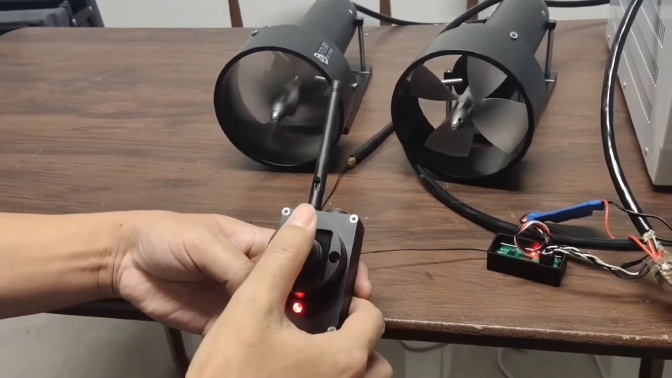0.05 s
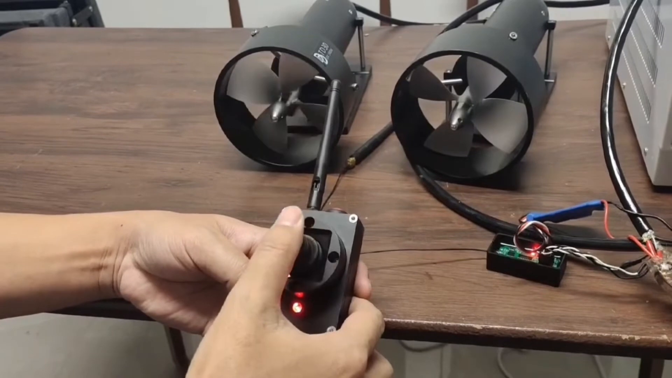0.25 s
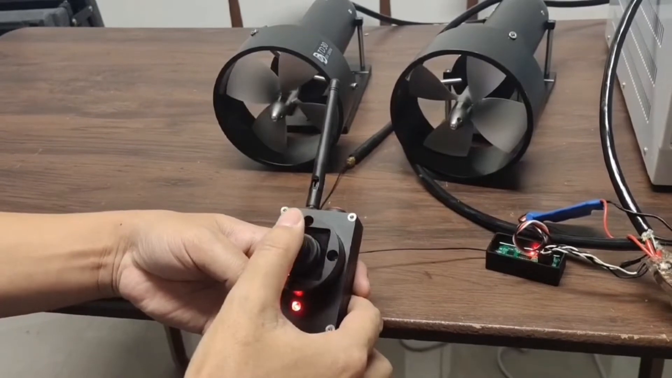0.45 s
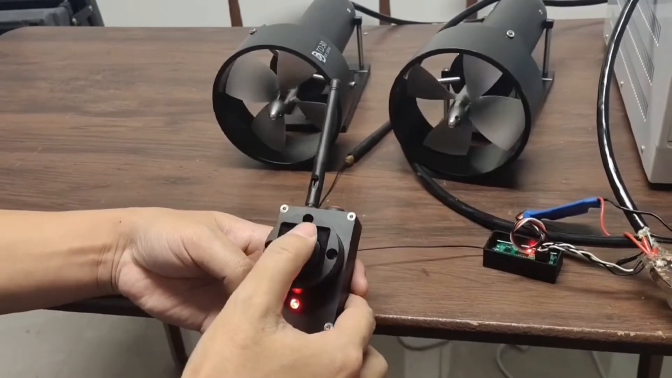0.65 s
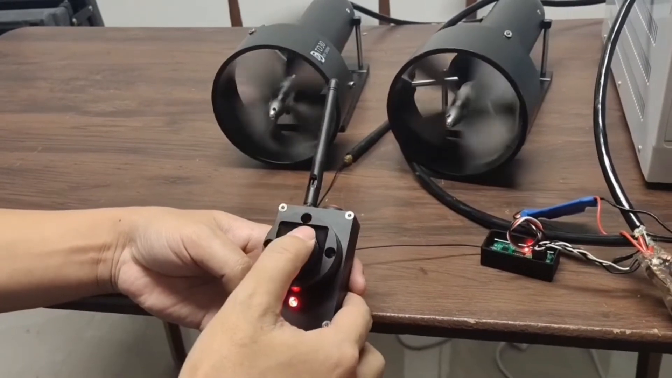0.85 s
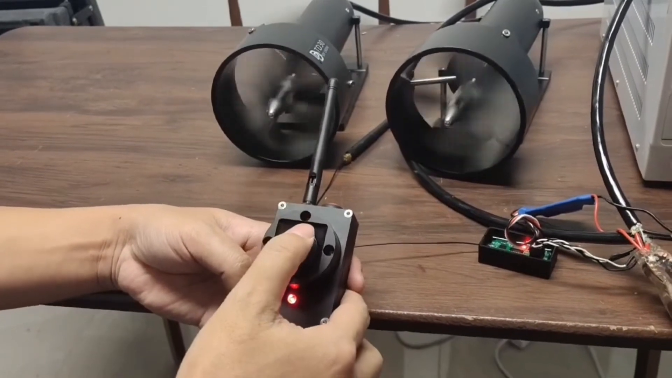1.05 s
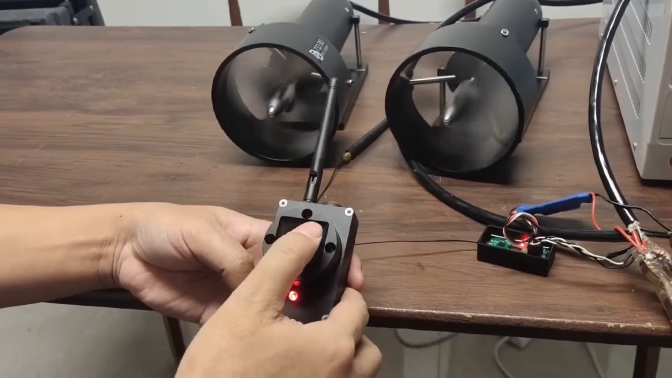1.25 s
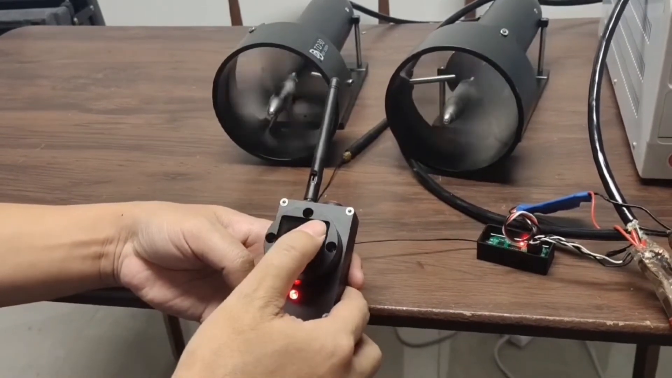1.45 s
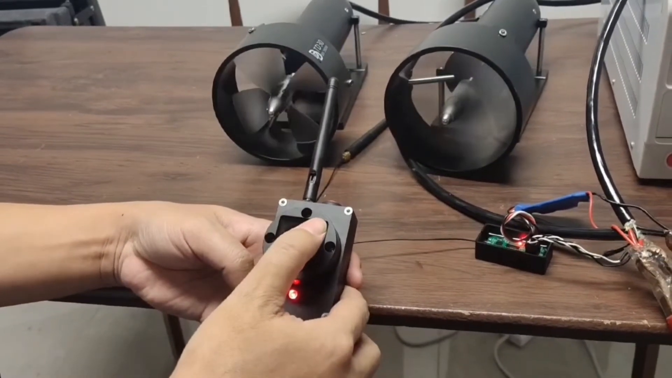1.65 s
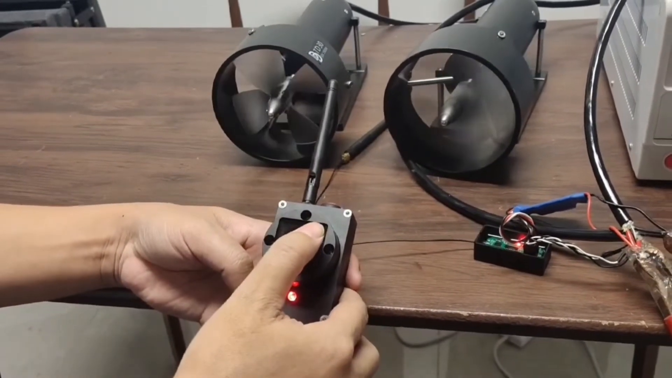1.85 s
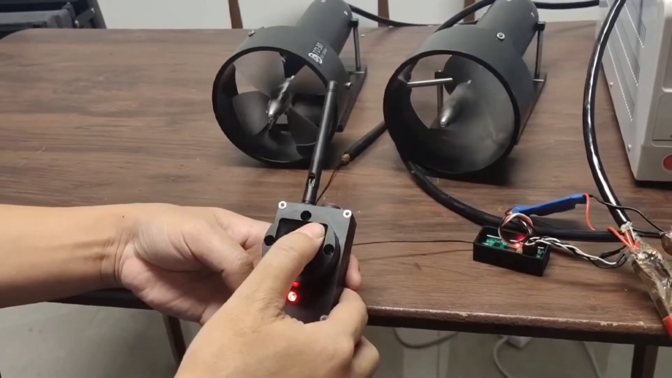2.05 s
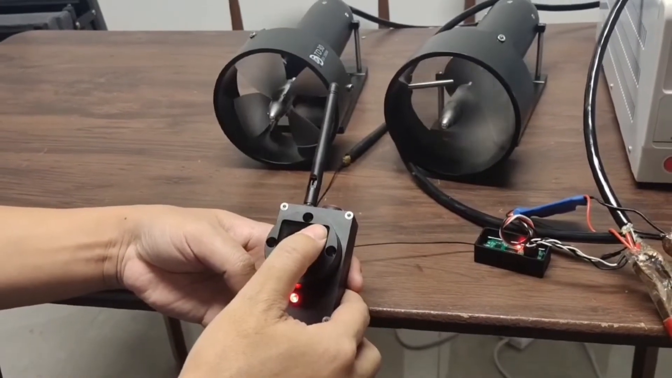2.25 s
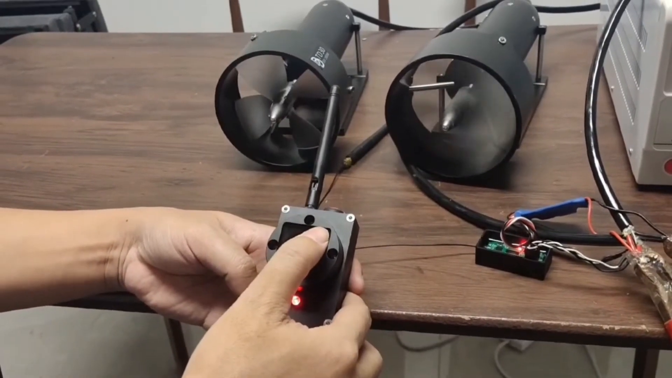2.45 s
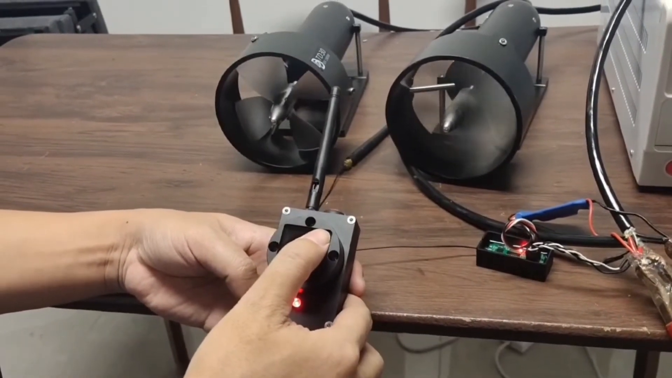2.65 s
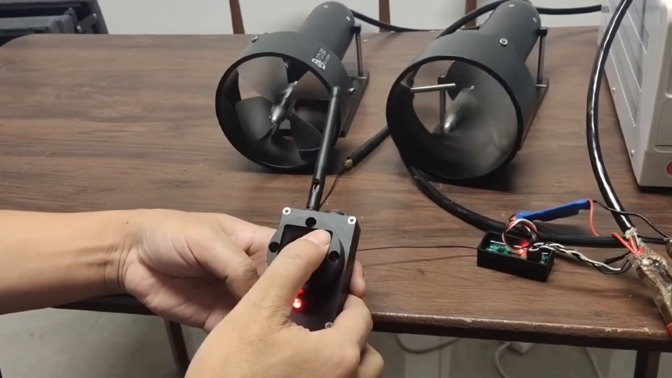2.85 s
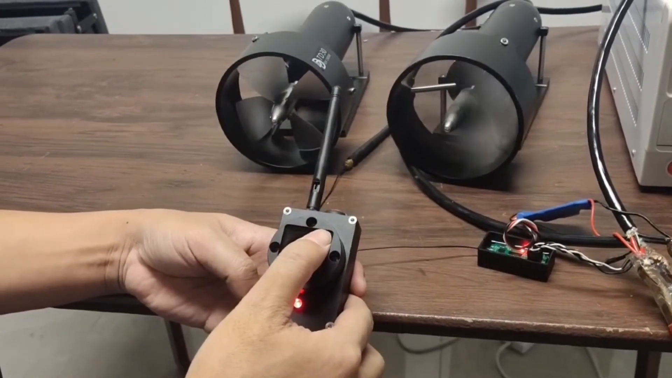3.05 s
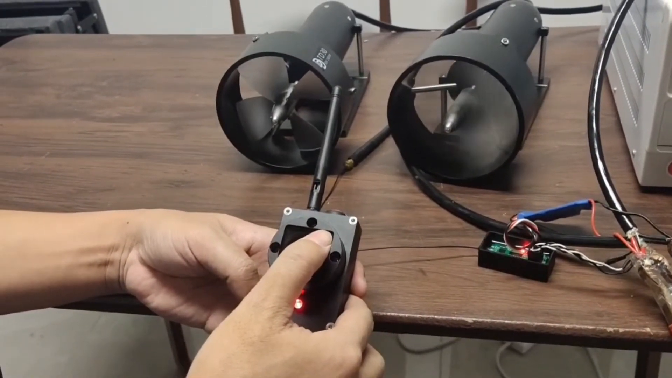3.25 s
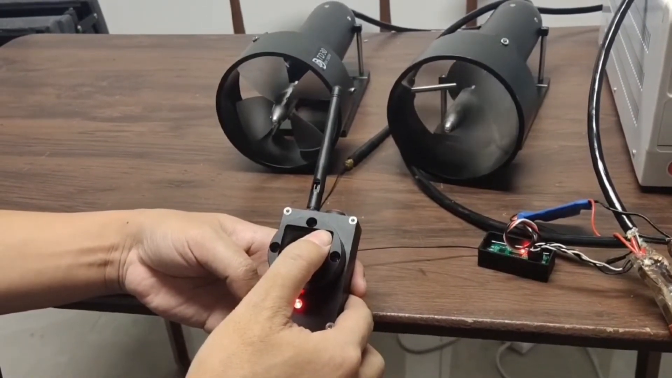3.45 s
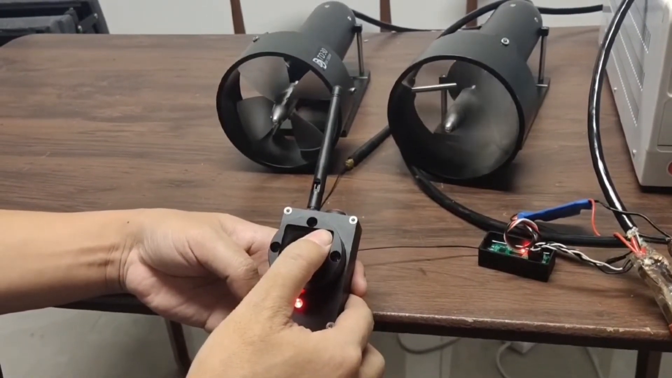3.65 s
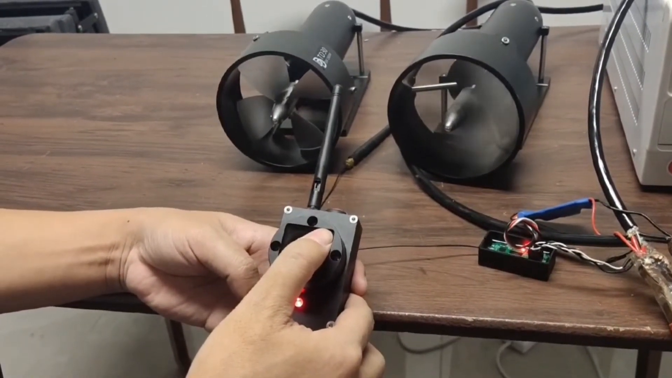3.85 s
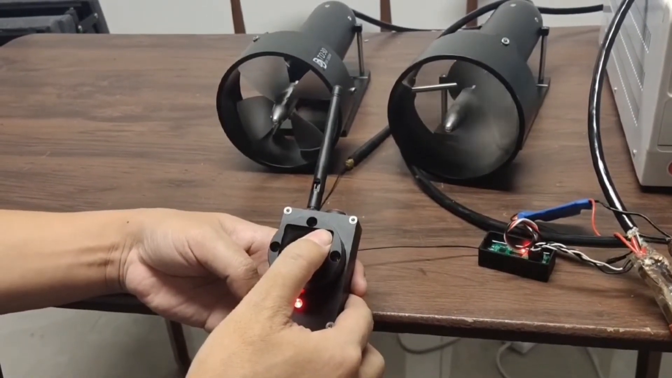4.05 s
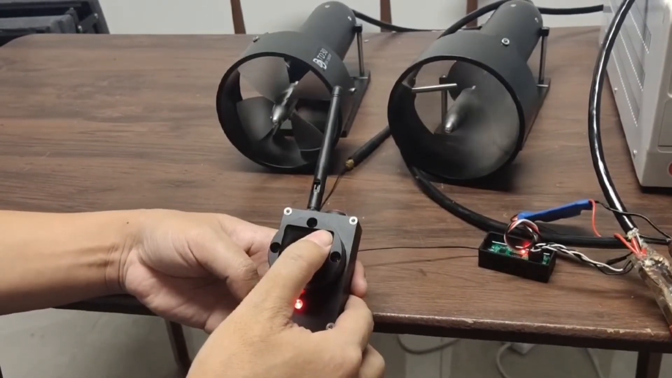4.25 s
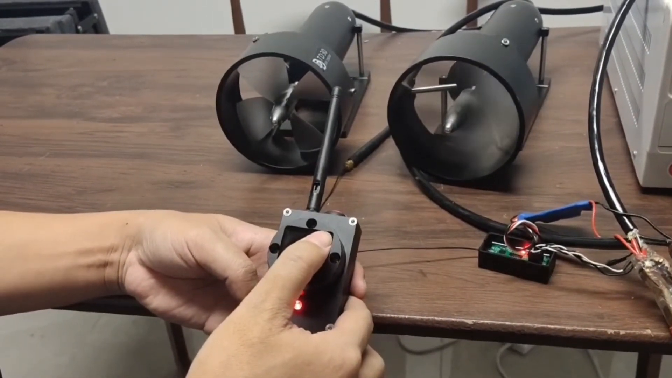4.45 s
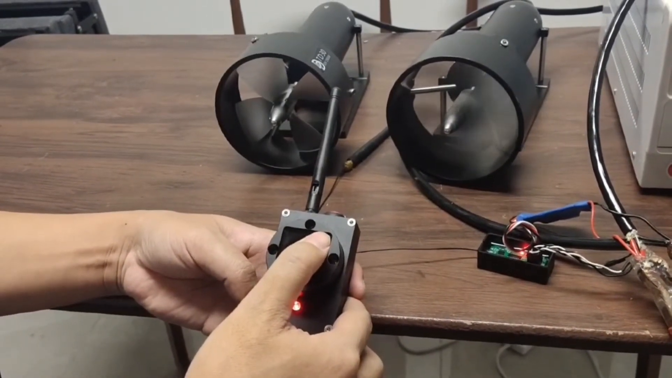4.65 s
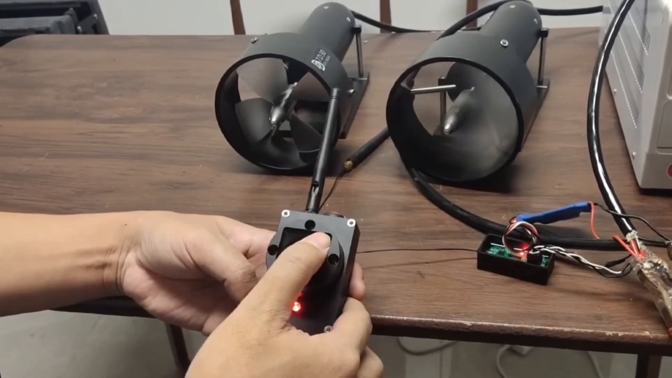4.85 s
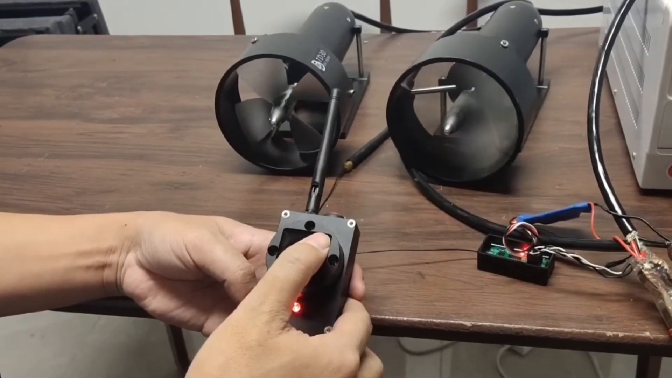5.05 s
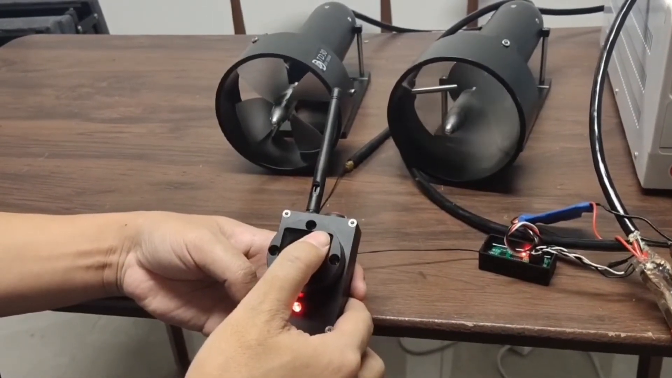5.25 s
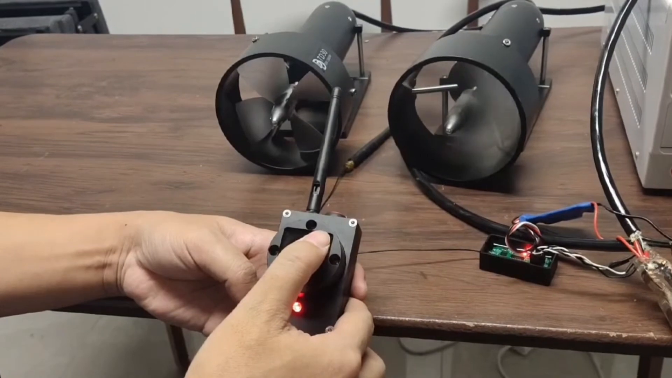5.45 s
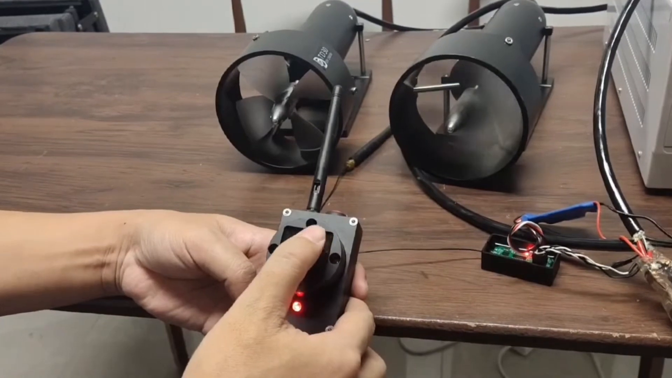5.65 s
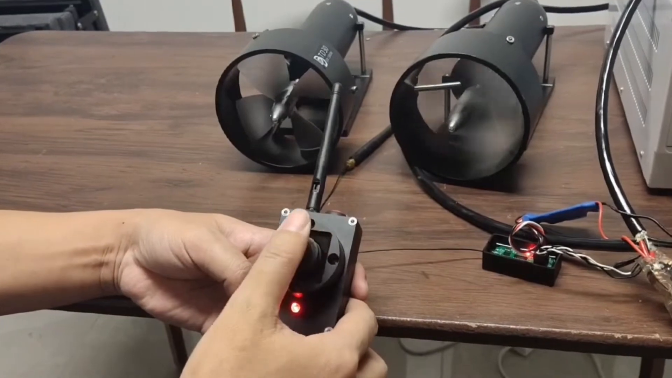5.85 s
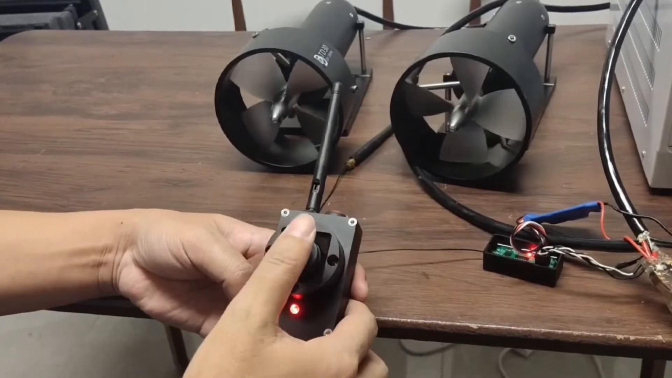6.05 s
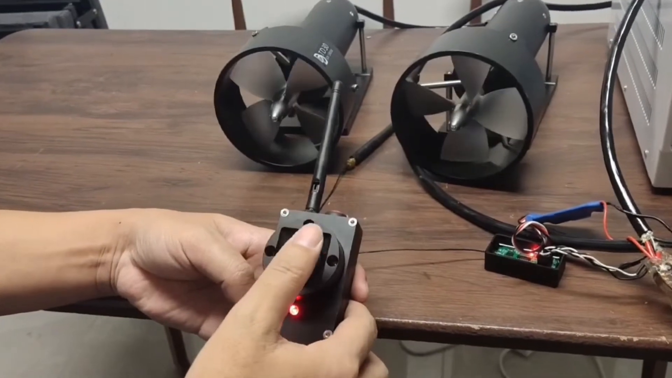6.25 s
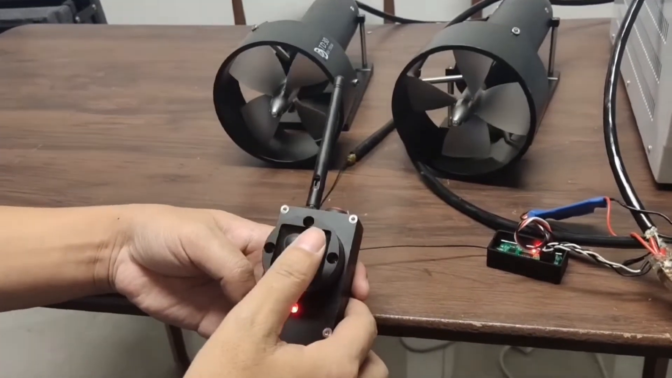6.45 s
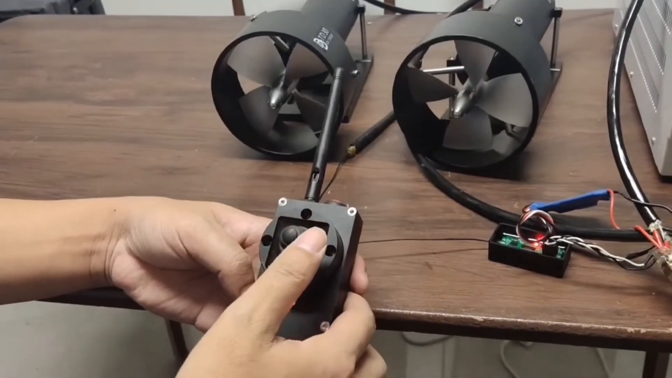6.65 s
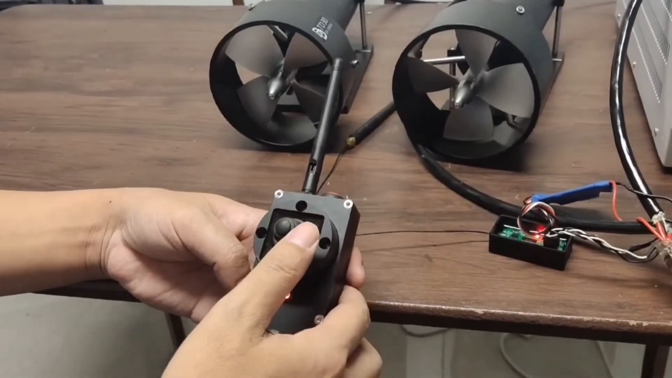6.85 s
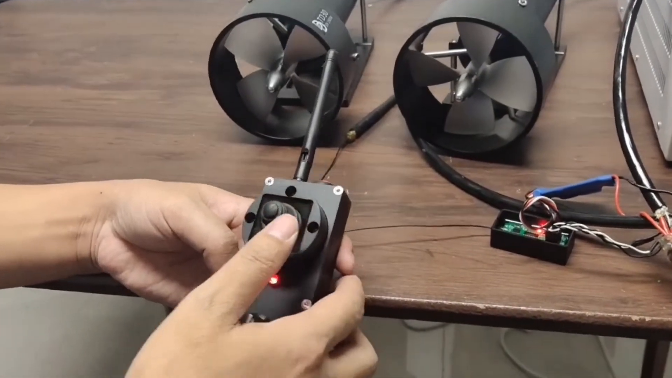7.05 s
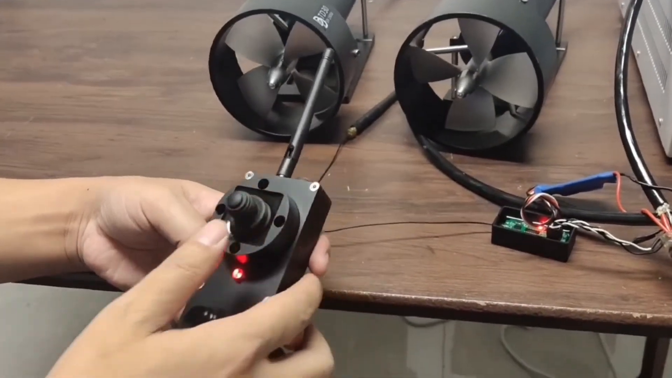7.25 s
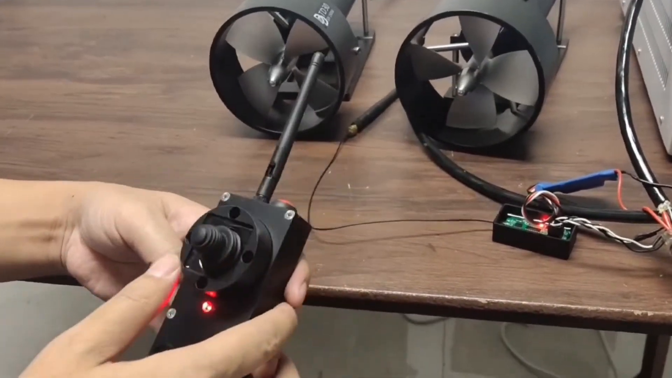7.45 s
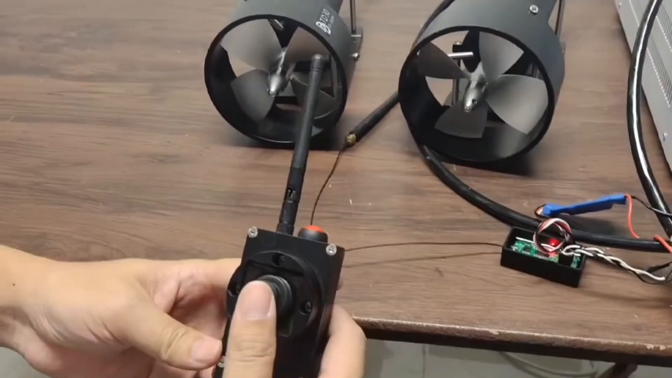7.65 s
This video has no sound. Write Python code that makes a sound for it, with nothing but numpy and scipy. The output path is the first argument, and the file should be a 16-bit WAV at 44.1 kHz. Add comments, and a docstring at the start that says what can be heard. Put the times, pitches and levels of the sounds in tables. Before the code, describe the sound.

Two small electric motors brake, judder back into motion and rise to a steady whine, then wind down before a joystick clicks.

```python
"""In a small room, two brushless thrusters run in air on a wooden table, steered by a hand-held joystick.
The left one brakes; both start with a judder; the left stalls while the right climbs to a steady whine
and brakes. Magnetic forces at multiples of the shaft rate sweep through the resonances of ducts and
table, the bearings rasp by friction, and braking jolts the housings against the table.
The joystick rubs, bumps and clicks over low room noise."""
import sys
import numpy as np
from scipy import signal
from scipy.fft import rfft, irfft, next_fast_len
from scipy.io import wavfile
from scipy.ndimage import uniform_filter1d, map_coordinates

SR = 44100
rng = np.random.default_rng(int(sys.argv[2]) if len(sys.argv) > 2 else 0)


def wrap_up_sound(samples):
    """Save the sound to the file named by the first command line argument, as 16-bit audio."""
    columns = np.atleast_2d(samples).T
    # keep every value between -1 and 1, then stretch to whole-number steps
    tamed = np.clip(columns, -1, 1)
    steps = np.round(tamed * 32767).astype(np.int16)
    wavfile.write(sys.argv[1], SR, steps)


N = 340009
COGS, FULL_HZ = 60, 1936.4  # cogging steps per turn; their rate at full speed (speed = 1)

# Braking, left then right. Each row: start in seconds, time to half speed in seconds, steepness,
# judder in dB, magnetic pull in dB, slip in cogging steps for each full speed lost per second.
BRAKES = [(.022, .128, 4, -26.5, 4, .005), (5.806, .138, 4, -26, 2, .016)]


def amp(db):
    """Decibels to amplitude ratio."""
    return np.exp(np.asarray(db) * (np.log(10) / 20))


def unit(x):
    """Normalisation to rms 1."""
    return x / np.sqrt(np.mean(x ** 2) + 1e-20)


def level_out(x):
    """Division by the envelope holds the running rms near 1."""
    power = np.abs(uniform_filter1d(x ** 2, size=4000))
    return x / np.sqrt(power + np.mean(power) / 1000)


def along(points, hz):
    """Interpolation of (Hz, value) points on a logarithmic frequency axis."""
    freqs, values = np.transpose(points)
    return np.interp(np.log(hz + 1), np.log(freqs + 1), values)


def curves(rows):
    """Linear interpolation in time of each column after the first."""
    times, *columns = np.transpose(rows)
    return [np.interp(np.arange(N) / SR, times, column) for column in columns]


def wobble(rate):
    """Smooth random modulation, rate knots a second."""
    knots = rng.standard_normal(2 ** 11)
    coarse = np.arange(0, N + 32, 32)
    return np.interp(np.arange(N), coarse, map_coordinates(knots, [coarse * rate / SR], mode="mirror"))


def ring(x, gain):
    """Minimum-phase filtering by gain(Hz): the ringing follows its excitation."""
    size = 2 * next_fast_len(N // 2 + SR // 4)
    cepstrum = irfft(np.log(np.maximum(gain(np.fft.rfftfreq(size, 1 / SR)), 1e-6)))
    cepstrum[1:size // 2] *= 2
    cepstrum[size // 2 + 1:] = 0
    return irfft(rfft(x, size) * np.exp(rfft(cepstrum)), size)[:N]


def colour(x, spectrum):
    """Zero-phase filtering by (Hz, dB) points."""
    size = next_fast_len(N + SR // 4)
    return irfft(rfft(x, size) * amp(along(spectrum, np.fft.rfftfreq(size, 1 / SR))), size)[:N]


def resonance(hz, centre, width):
    """Gain of a damped oscillator, 1 at its centre."""
    return 1 / np.hypot(1, (hz ** 2 - centre ** 2) / (width * (hz + 1)))


def frame(hz):
    """Modal response of ducts and table: narrow resonances add in power on a broad curve."""
    # Each row: centre in Hz, width in Hz, height over the broad curve in dB.
    modes = [(125, 7, 26), (188, 12, 12), (301, 18, 11.5), (501, 14, 9), (597, 7, 18), (1405, 32, 23),
             (1700, 32, 18), (2420, 26, 25.5)]
    # Each row: frequency in Hz, gain in dB.
    broad = [(40, -42.5), (90, -36.5), (130, -29.5), (220, -16), (320, -1), (480, 0), (548, -7), (620, 0),
             (660, -1), (900, -3), (1250, -8), (1520, -14), (1800, -2), (1950, -14.5), (3000, -17.5),
             (11000, -59.5)]
    peaks = sum(amp(db) ** 2 / (1 + (2 * (hz - centre) / width) ** 2) for centre, width, db in modes)
    return amp(along(broad, hz)) * np.sqrt(1 + peaks)


def room(x):
    """Reverberation: a diffuse tail decays exponentially, soonest in the high treble."""
    # Each row: frequency in Hz, time to fall 60 dB in seconds.
    decay_times = [(120, 0.94), (500, 0.33), (1600, 0.62), (2400, 0.46), (6000, 0.35), (10000, 0.18)]
    hz, t, spectra = signal.stft(rng.standard_normal(SR), SR, nperseg=256)
    tail = signal.istft(spectra * amp(-60 * t / along(decay_times, hz)[:, None]), SR, nperseg=256)[1]
    return signal.fftconvolve(np.pad(x, (200, 0)), tail / np.linalg.norm(tail))[:N]


def background():
    """Incoherent addition: low room noise and the rustle of a shifting grip sum in power."""
    # Each row: centre in seconds, half length in seconds, level in dB.
    grips = [(7.065, 0.11, -66), (7.443, 0.13, -61.5)]
    # Each row: frequency in Hz, relative spectral density in dB.
    air = [(18, -42.5), (30, -49.5), (76, -15), (177, -1), (284, -11), (347, -14), (586, -14.5),
           (1180, -22), (2260, -22), (2760, -25.5), (3290, -27.5), (6290, -33), (11800, -37), (15300, -66),
           (22000, -120)]
    t = np.arange(N) / SR
    rustle_power = sum(amp(db) ** 2 * np.exp(-((t - s) / half_s) ** 2) for s, half_s, db in grips)
    envelope = np.sqrt(amp(-67.5) ** 2 + rustle_power) * amp(.8 * wobble(12))
    return envelope * unit(colour(rng.standard_normal(N), air))


def braked(start_s, half_s, steepness, judder_db, pull_db):
    """Deceleration: the share of speed left, a judder that follows its fall, and a fading pull in dB."""
    age = np.maximum(np.arange(N) / SR - start_s, 0)
    share = 1 / (1 + (age / half_s) ** steepness)
    lost = 1 - share
    slowing = np.abs(np.gradient(share)) * SR * half_s
    brake_db = pull_db * np.minimum(lost * 8, 1) - 19 * lost ** 2.6
    return share, amp(judder_db) * (slowing * lost) ** .76, brake_db


def driven(rows, smooth_speed=.74, kick_s=.06):
    """Speed, pull in dB, rasp and judder under drive: uneven torque shakes a slow rotor, most at first."""
    cog_hz, pull_db, rasp_db = curves(rows)
    t = np.arange(N) / SR
    cog_hz = cog_hz * ((t < rows[-1][0]) | (cog_hz > FULL_HZ / 2))  # a stalled motor stays still
    speed = np.maximum(cog_hz, 0) / FULL_HZ
    age = np.maximum(t - rows[0][0], 0)
    running = np.clip(cog_hz - 2, 0, 1) * (age > 0)
    shake = amp(-37 + 2 * np.exp(-age / kick_s)) / (1 + (speed / smooth_speed) ** 12)
    return speed, pull_db, running * amp(rasp_db), running * shake


def motors(full_pull_db=.5, full_rasp_db=-38, rasp_exponent=.8):
    """Drive and brake set each rotor's speed, pull in dB, rasp and judder; the left opens at full speed."""
    # Each row of a run: time in seconds, cogging rate in Hz, magnetic pull in dB, bearing rasp in dB.
    left_run = [(.712, 0, -11.5, -62), (1.05, 530, -8, -49.5), (1.2, 800.5, -1.5, -42),
                (1.32, 1020.5, 2, -42), (1.45, 660, -4.5, -45.5), (1.55, 470, -5, -46.5),
                (1.65, 286.5, -15, -48), (1.72, 136, -24, -51), (1.88, 6, -28, -51.5)]
    right_run = [(.712, 0, -15.5, -60), (.9, 305, -6, -52.5), (1, 456, 3, -49.5), (1.1, 635.5, -2.5, -50),
                 (1.3, 999, -2, -52.5), (1.5, 1286.5, 3.5, -46), (1.61, 1395, -5, -46.5),
                 (1.7, 1461.5, -2, -47), (1.85, 1595, -5, -43), (1.9, 1676.5, 0, -50.5),
                 (2.05, 1795.5, -4.5, -48.5), (2.2, FULL_HZ, 1, -46.5)]
    share, jerk, brake_db = braked(*BRAKES[0][:-1])
    speed, pull_db, rub, shake = driven(left_run)
    pull_db = np.where(speed > share, pull_db, full_pull_db + brake_db)
    left = share + speed, pull_db, rub + amp(full_rasp_db) * share ** rasp_exponent, shake + jerk
    share, jerk, brake_db = braked(*BRAKES[1][:-1])
    speed, pull_db, rub, shake = driven(right_run)
    right = share * speed, pull_db + brake_db, rub * share ** rasp_exponent, shake * share + jerk
    return left, right


def deceleration(speed):
    """Rate of fall, in full speeds per second."""
    return np.maximum(-uniform_filter1d(np.gradient(speed), size=800) * SR, 0)


def shaft(speed, flutter=.0004):
    """A slightly unsteady speed and its integral, the rotor's angle in turns."""
    speed = speed * (1 + flutter * wobble(12))
    return speed, np.cumsum(speed) * FULL_HZ / COGS / SR


def tones(lines, turns, waver=0):
    """Shaft orders: sines locked to whole multiples of the rotation rate, wavering in amplitude."""
    total = np.zeros(N, np.float32)
    angle = (2 * np.pi * (turns % 1)).astype(np.float32)
    for hz, db in lines:
        line = float(amp(db)) * np.sin(round(hz * COGS / FULL_HZ) * angle + 2 * np.pi * rng.random())
        total += line * (1 + waver * wobble(6)) if waver else line
    return np.sqrt(2) * total


def hum(lines, speed, turns, pull_db, glide_db, slip):
    """Forced vibration: pole and cogging forces sweep through the resonances of ducts and table."""
    # Overtones of a rotor straining below full speed. Each row: full-speed pitch in Hz, force in dB.
    strain_lines = [(968, -48.5), (1291, -56), (2001, -54), (3873, -55)]
    # a slow or braking rotor runs unevenly
    braking = deceleration(speed)
    grit = np.clip(.45 * (1 - speed) + 5 * slip * braking, 0, 1)
    uneven_turns = turns + (.2 * grit + slip * braking) * wobble(170) / COGS
    surge = amp(6 * grit * (wobble(80) - .6))
    forces = [(hz, db - 20 * np.log10(frame(hz))) for hz, db in sorted(lines)]
    cogging = tones(forces[-1:], uneven_turns)
    poles = tones(forces[:-1], uneven_turns) * amp(glide_db * np.clip((1 - speed) * 6, 0, 1))
    poles /= 1 + .23 * braking  # the brake takes the drive off the poles
    strain = tones(strain_lines, uneven_turns) * np.clip((1 - speed) * 3, 0, 1)
    crawl_db = 20.5 * np.exp(-speed / .13)  # a rotor cogs harder at a crawl
    pull = amp(pull_db + crawl_db) * np.minimum(speed * 20, 1) ** 3
    return ring(pull * surge * (cogging + poles + strain), frame)


def housing_rings(turns, fuzz=.64, swing=.5):
    """Resonance: the shaft excites two housing modes, which swell and fade and are fuzzy in pitch."""
    # Each row: time in seconds, level in dB before swing narrows its range.
    low_levels = [(2.2, -59), (2.31, -37.5), (2.43, -76), (2.46, -47.5), (2.53, -67.5), (3.18, -48),
                  (3.58, -60.5), (4.34, -50), (4.44, -55.5), (4.47, -44.5), (5.13, -45.5), (5.16, -57.5),
                  (5.3, -45.5), (5.36, -58.5), (5.57, -39), (5.67, -54.5), (5.8, -40), (5.85, -42.5)]
    high_levels = [(2.2, -56.5), (2.86, -77), (2.93, -41), (3.1, -72), (4.63, -61), (4.77, -68),
                   (4.83, -35.5), (4.87, -61), (5.12, -43.5), (5.16, -81), (5.28, -52.5), (5.31, -67),
                   (5.46, -46.5), (5.59, -71), (5.65, -45), (5.85, -56)]
    total = np.zeros(N)
    for hz, trim_db, levels in [(2420, 0, low_levels), (3324, -1, high_levels)]:
        angle = 2 * np.pi * round(hz * COGS / FULL_HZ) * turns
        level_db, = curves(levels)
        level_db = level_db.mean() + swing * (level_db - level_db.mean())
        mode = (1 + fuzz * wobble(50)) * np.sin(angle) + fuzz * wobble(50) * np.cos(angle)
        total += amp(level_db + trim_db) * unit(mode)
    return total


def bearing_song(lines, speed, turns):
    """Periodic excitation: bearing and housing sing at shaft orders, only close to full speed."""
    return np.minimum(speed, 1) ** 40 * (amp(1) * tones(lines, turns, waver=.14) + housing_rings(turns))


def roughness(turns, loose, pole_db=0):
    """Cyclic noise: a bearing's roughness repeats each turn, except for a loose share of its power."""
    angle = np.arange(2 ** 12) / 2 ** 12
    orders = np.arange(len(angle) // 2 + 1)
    bursts = amp(unit(signal.resample(rng.standard_normal(2 ** 5), len(angle))))
    bursts *= amp(1.7 * np.cos(2 * np.pi * angle))  # one swell a turn
    sizes = amp(pole_db * (orders % 20 == 0)) * (orders < 640)  # 20 poles pass per turn
    track = unit(irfft(sizes * np.exp(2j * np.pi * rng.random(len(orders)))))
    place = turns % 1
    rub = np.sqrt(1 - loose) * np.interp(place, angle, track) + np.sqrt(loose) * rng.standard_normal(N)
    return rub * np.interp(place, angle, bursts)


def rasp(speed, turns, shell_db):
    """Friction noise: a bearing buzzes in its housing near full speed and scrapes broadly below it."""
    # Each row of a spectrum: frequency in Hz, gain in dB.
    shell_spectrum = [(70, -59.5), (190, -2), (280, -4), (420, -15.5), (630, 8.5), (830, 3), (1150, -6),
                      (1350, 1), (1550, -4.5), (2050, 5.5), (2250, -1), (2530, 7.5), (2660, -12),
                      (3100, -56)]
    buzz_spectrum = [(1590, -45), (2700, -7), (3020, -13.5), (3220, -2), (3450, -3.5), (4100, -20.5),
                     (4500, -9.5), (4750, -11), (5530, -0.5), (6080, -20.5), (6500, -12.5), (6850, -46),
                     (8300, -13), (9600, -6.5), (10400, -9.5), (11000, -35.5), (14300, -61), (22000, -120)]
    scrape_spectrum = [(1590, -23.5), (2700, -3.5), (2980, -10.5), (3360, -1), (3770, -12.5), (4450, -2.5),
                       (4830, -4.5), (5500, 2.5), (6790, -14.5), (7420, -6.5), (8400, -4), (10200, -8),
                       (11000, -52), (14300, -82), (22000, -120)]
    buzz = roughness(turns, loose=.3)
    rattle = roughness(turns, loose=.44)
    scrape = roughness(turns, loose=np.clip(1 - 1.6 * speed ** 2, .35, 1), pole_db=11)
    housing = amp(shell_db + 1.1 * wobble(4.8)) * unit(colour(rattle, shell_spectrum))
    fast = amp(-.97) * unit(colour(buzz, buzz_spectrum)) + housing
    rung = unit(ring(scrape, lambda hz: frame(hz) * np.minimum(hz / 2400, 1) ** 2))
    slow = unit(colour(scrape, scrape_spectrum)) + amp(-1.5) * rung
    settled = np.clip(speed, 0, 1) ** 7
    return settled * fast + np.sqrt(1 - settled ** 2) * slow


def whine(speed, turns, pull_db):
    """Harmonics of the pole rate grow with speed, then fade as full speed nears."""
    # Each row: full-speed pitch in Hz, relative level in dB.
    overtones = [(5164, -60), (5809, -58), (6455, -56), (7100, -56), (7746, -57), (8391, -61), (10328, -62),
                 (10973, -60)]
    envelope = amp(-5.5 + pull_db / 2) * speed ** 1.5 * np.clip((1 - speed) * 4, 0, 1) ** 2
    return envelope * tones(overtones, turns, waver=.5)


def judder(speed, turns, scatter_db=3):
    """Impulse train: the drive chatters and kicks the rotor unevenly at each pole."""
    steps = np.diff(np.floor(20 * turns), prepend=0)
    kicks = steps * amp(scatter_db * rng.standard_normal(N)) * rng.choice([-1, 1], N)
    chatter = .028 * rng.standard_normal(N)
    return kicks * np.minimum(speed * 6, 1) + chatter


def duct_rings(swept):
    """Free decay: the ducts ring on after a braking tone has swept through their modes."""
    # Each row: centre in Hz, width in Hz, gain in dB.
    modes = [(598, 3.6, 12), (1398, 4.2, 7.5), (1692, 4.4, 4.5), (1728, 4.4, 2)]
    return ring(swept, lambda hz: np.sqrt(sum((amp(db) * resonance(hz, centre, width)) ** 2
                                              for centre, width, db in modes)))


def shudder(speed, turns):
    """Low-frequency forcing: the cogging of a rotor slowing to rest shakes the table."""
    force = amp(-38.5) * np.minimum(deceleration(speed), 1) * np.clip(1.5 - 5 * speed, 0, 1)
    return force * np.sqrt(2) * np.sin(2 * np.pi * COGS * turns)


def thrusters():
    """Superposition of both motors, the ducts and table they excite, and their reverberation."""
    # Magnetic hum and bearing song. Each row: full-speed pitch in Hz, relative level in dB.
    left_hum = [(323, -47), (387, -46.5), (581, -58), (645, -40), (1291, -70), (1936, -50.5)]
    left_song = [(2098, -54), (2388, -50), (2679, -55), (5164, -52), (5228, -55), (5519, -51), (5680, -58),
                 (9555, -62)]
    right_hum = [(258, -73.5), (581, -57.5), (613, -56), (645, -42.5), (678, -66.5), (1291, -57),
                 (1743, -64), (1936, -50)]
    right_song = [(2065, -62.5), (2196, -61), (3873, -72), (4452, -69), (4517, -63.5), (4582, -70),
                  (4872, -57), (4969, -62.5), (5033, -60.5), (5325, -63), (5356, -56.5), (5390, -63),
                  (5421, -62.5), (5486, -52), (5550, -65), (5680, -66), (5745, -65), (5809, -62),
                  (6132, -73), (7101, -73), (7423, -77), (7650, -76), (9488, -68), (9555, -63.5),
                  (10169, -69)]
    # Colour of the judder. Each row: frequency in Hz, gain in dB.
    kick_spectrum = [(40, 12), (130, -30.5), (220, -15), (400, 7.5), (600, 4.5), (800, 1), (1000, -4),
                     (1400, -5), (1700, -5.5), (2400, -12.5), (3200, -13.5), (6000, -9.5)]
    builds = [(left_hum, left_song, -6, -4.5), (right_hum, right_song, -2.5, -.5)]
    tonal, gliding, swept, rub, kicks, shake_power, rocking = np.zeros((7, N))
    for build, brake, motion in zip(builds, BRAKES, motors()):
        hum_lines, song_lines, glide_db, shell_db = build
        mean_speed, pull_db, rasp_gain, shake = motion
        speed, turns = shaft(mean_speed)
        tone = hum(hum_lines, speed, turns, pull_db, glide_db, slip=brake[-1])
        tonal += tone + bearing_song(song_lines, speed, turns) + whine(speed, turns, pull_db)
        # a held tone merges with its own echo; a gliding one leaves a trail
        gliding += tone * np.clip((1 - speed) * 14, 0, 1)
        swept += tone * np.clip(deceleration(mean_speed) / 2 - .5, 0, 1)
        turning = np.minimum(speed / .011, 1) ** 2  # friction stops a creeping rotor
        rub += amp(-2.5) * turning * rasp_gain * rasp(speed, turns, shell_db)
        kicks += judder(speed, turns)
        shake_power += (turning * shake) ** 2
        rocking += shudder(mean_speed, turns)
    rung_kicks = ring(kicks, lambda hz: frame(hz) * amp(along(kick_spectrum, hz)))
    knocks = amp(-9) * np.sqrt(shake_power) * level_out(rung_kicks)
    table = ring(rocking, lambda hz: resonance(hz, centre=126, width=36) ** 3)  # its lowest mode
    echo = amp(-6) * room(gliding + knocks) + amp(-7) * room(rub)
    return tonal + rub + knocks + table + duct_rings(swept) + echo


def boom(hz, age, t60_s):
    """Damped oscillation of a low mode struck softly."""
    return amp(-60 * age / t60_s) * (1 - np.exp(-age / .0014)) ** 2 * np.sin(2 * np.pi * hz * age)


def jolts():
    """Impact excitation: braking rattles a housing on the table, ringing the ducts and booming the top."""
    # Each row: start in seconds, relative force in dB, boom level in dB, boom pitch in Hz.
    impacts = [(.177, -26, -34, 290), (.199, -30, -25, 295), (.25, -35, -31, 280), (.279, -42, -36, 190),
               (5.928, -28, -37, 190), (5.944, -27, -32, 190), (5.954, -28, -35, 290),
               (5.974, -28, -30, 270), (5.984, -30, -29, 290), (6.008, -33, -30, 190),
               (6.04, -39, -33, 185), (6.076, -45, -33, 185), (6.109, -50, -33, 185)]
    # Each row: frequency in Hz, gain in dB.
    thud_spectrum = [(40, -35), (110, 6), (190, 10), (300, 3), (480, -9), (600, -7), (850, 6), (1150, 4),
                     (1400, 4), (1800, -4), (2400, -20), (6000, -8)]
    age = np.arange(SR // 10) / SR
    contacts, booms = np.zeros((2, N))
    for s, force_db, boom_db, boom_hz in impacts:
        push = amp(-60 * age / .025) * rng.standard_normal(len(age))
        at = round(s * SR)
        contacts[at:][:len(age)] += amp(force_db + 24) * push / np.linalg.norm(push)
        booms[at:][:len(age)] += amp(boom_db) * boom(boom_hz, age, t60_s=.13)
    thuds = ring(contacts, lambda hz: frame(hz) * amp(along(thud_spectrum, hz))) + booms
    return thuds + amp(-11.5) * room(thuds)


def thumb_rubs(age, width_octaves=.059, skirt_db=-15.5):
    """Friction of the thumb on the stick: a narrow squeak on a broad skirt of noise."""
    # Each row: centre in seconds, half length in seconds, pitch in Hz, level in dB.
    scuffs = [(0.635, .03, 3000, -71.5), (6.447, .03, 2940, -69), (6.602, .04, 520, -68),
              (6.693, .05, 2650, -75), (6.86, 0.023, 530, -66), (7.08, 0.015, 2730, -70),
              (7.365, 0.0086, 2800, -74), (7.462, 0.013, 2520, -72.5)]
    rubs = np.zeros(N + SR)
    for s, half_s, hz, db in scuffs:
        octaves = np.log2((np.fft.rfftfreq(len(age), 1 / SR) + 1) / hz)
        band = 1 / (1 + (octaves / width_octaves) ** 2) + amp(skirt_db) * np.exp(-octaves ** 2 / 2)
        squeak = unit(irfft(rfft(rng.standard_normal(len(age))) * band, len(age)))
        swell = np.exp(-((age - age.mean()) / half_s) ** 2 / 2)
        rubs[round((s - age.mean()) * SR):][:len(age)] += amp(db) * swell * squeak
    return rubs[:N]


def finger_bumps(age):
    """Soft impacts of the fingers excite a low mode of the joystick's case."""
    # Each row: start in seconds, level in dB.
    touches = [(6.317, -48), (6.406, -52), (6.529, -48), (7.045, -51), (7.169, -46), (7.372, -51),
               (7.395, -47)]
    bumps = np.zeros(N + SR)
    for s, db in touches:
        hz = 173 * np.exp(.083 * rng.standard_normal())
        bumps[round(s * SR):][:len(age)] += amp(db) * boom(hz, age, t60_s=.077)
    return bumps[:N]


def stick_clicks(age, t60_s=.012):
    """Hard impacts of the released stick: brief broadband bursts, coloured by the plastic."""
    # Each row: start in seconds, burst level in dB.
    clicks = [(6.526, -54), (7.169, -62), (7.431, -28.5)]
    # Each row: frequency in Hz, gain in dB.
    plastic = [(200, -12), (900, -13), (1600, 0), (2700, -2), (3600, -15), (6000, -19), (11000, -28)]
    taps = np.zeros(N + SR)
    for s, db in clicks:
        taps[round(s * SR):][:len(age)] += amp(db - 60 * age / t60_s) * rng.standard_normal(len(age))
    return ring(taps[:N], lambda hz: amp(along(plastic, hz)))


def joystick():
    """Direct sound and reverberation of the hand on the joystick."""
    age = np.arange(SR // 4) / SR
    handling = stick_clicks(age) + thumb_rubs(age) + finger_bumps(age)
    return handling + amp(-10) * room(handling)


def scene():
    """Superposition of motors, jolts, joystick and room noise in one channel."""
    return (thrusters() + jolts() + joystick() + background())[None]


def record(dry, end_s=7.511, top_hz=10900):
    """Gating and band limiting: the sound stops at end_s, and nothing passes above top_hz."""
    live = np.arange(N) / SR < end_s
    size = next_fast_len(N + SR // 4)
    passband = np.fft.rfftfreq(size, 1 / SR) < top_hz
    return irfft(rfft(dry * live, size) * passband, size)[:, :N]


dry = scene()
out = record(dry)
wrap_up_sound(out)
```